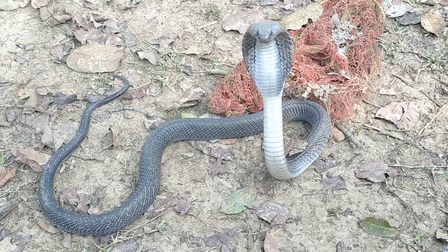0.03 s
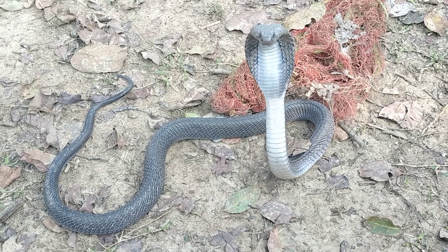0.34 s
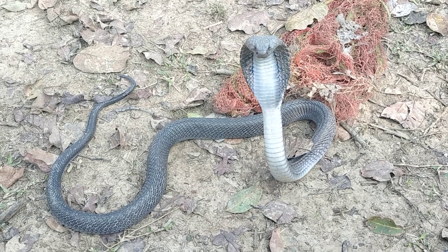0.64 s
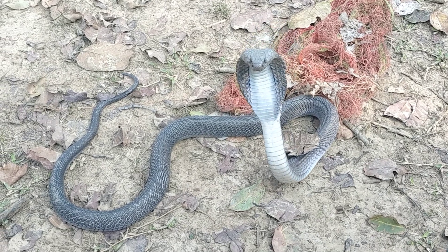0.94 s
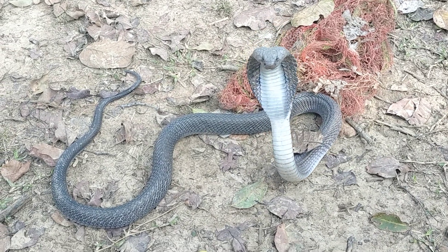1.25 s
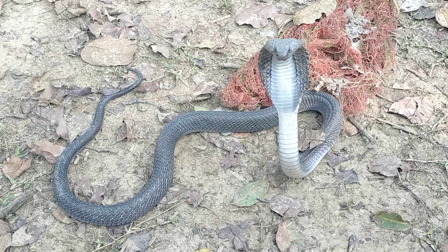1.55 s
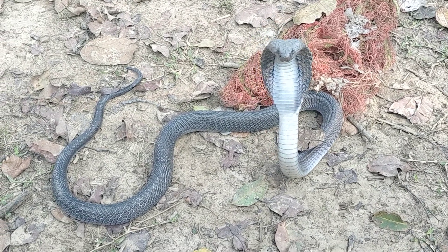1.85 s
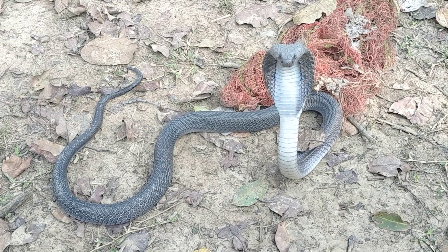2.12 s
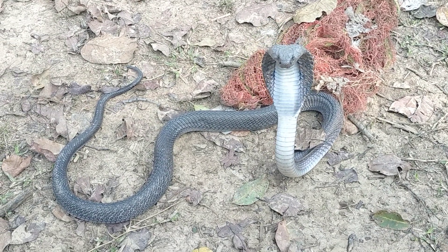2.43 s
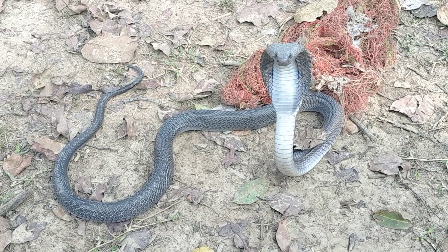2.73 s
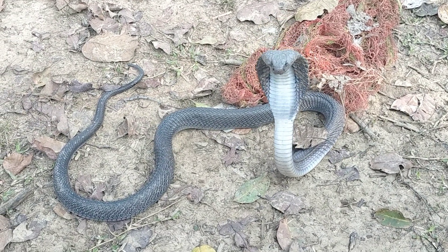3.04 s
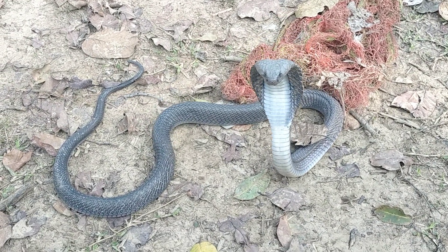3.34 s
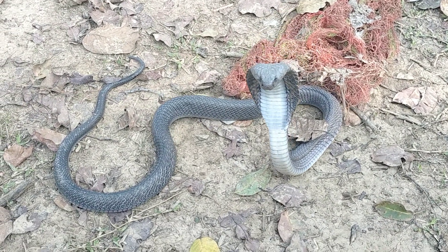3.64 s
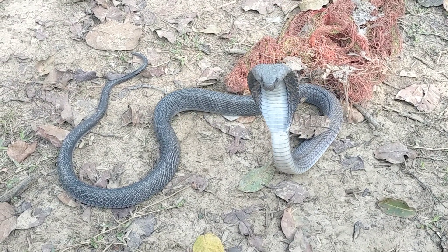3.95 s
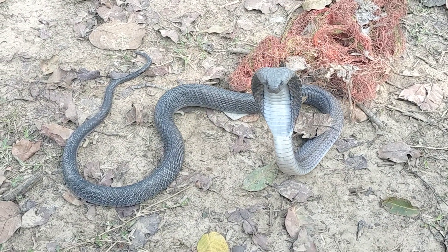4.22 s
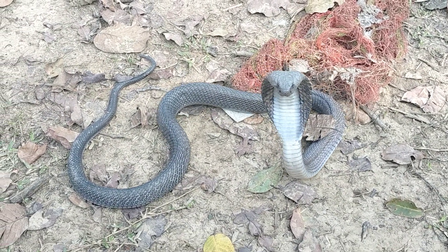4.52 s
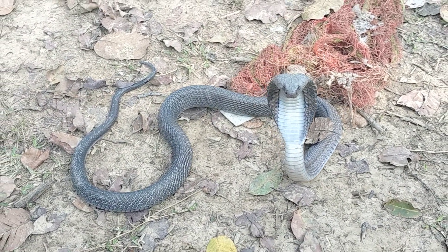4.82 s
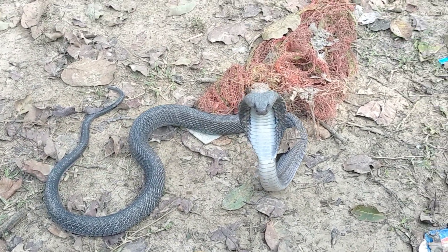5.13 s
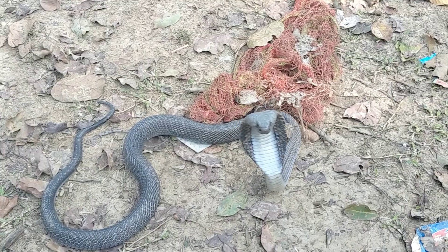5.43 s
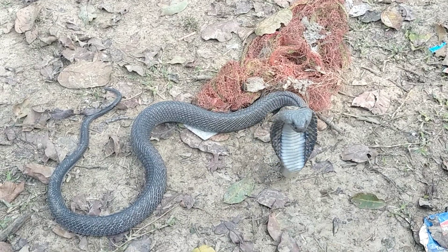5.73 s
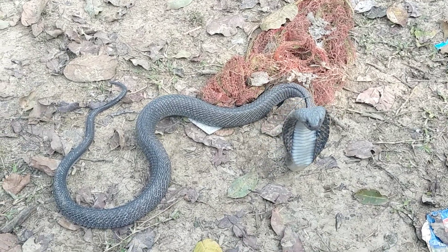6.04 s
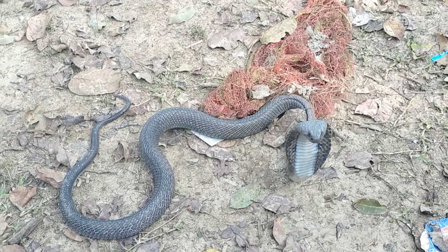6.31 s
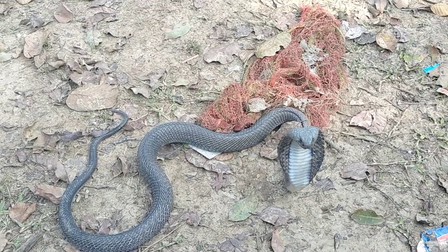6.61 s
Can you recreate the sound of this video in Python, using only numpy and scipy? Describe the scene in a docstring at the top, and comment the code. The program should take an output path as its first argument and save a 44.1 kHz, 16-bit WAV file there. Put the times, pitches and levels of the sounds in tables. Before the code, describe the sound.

Outdoors, a distant engine hums over a low rumble and a soft airy breeze. A thin, faint high hiss, perhaps from a cobra, comes and goes twice. Close by and slightly to the right, the snake's scales scrape dry leaves with a few sharp snaps. Later it lunges in a louder burst of crunching leaves and dull scuffs on gritty earth, followed by two softer scrapes.

```python
"""A cobra on dry earth and dead leaves shifts and lunges outdoors: its scales scrape and snap
the leaves, and its weight scuffs grit over the ground. A thin high hiss, perhaps the snake,
comes and goes twice. Behind it a distant engine hums, slows and fades into a low drone and
rumble, while the airy wash of the breeze slowly brightens."""
import sys
import numpy as np
from scipy import signal
from scipy.io import wavfile

SR = 44100
rng = np.random.default_rng(int(sys.argv[2]) if len(sys.argv) > 2 else 0)


def wav_record(signal):
    """Record a signal, one row per channel, as 16-bit PCM in the file named by sys.argv[1]."""
    frames = np.transpose(np.atleast_2d(signal))
    bounded = np.clip(frames, -1, 1)
    # unit amplitude maps onto the largest positive 16-bit level
    quanta = np.round(bounded * 32767).astype(np.int16)
    wavfile.write(sys.argv[1], SR, quanta)


N = 294147
START_S = .572
TIME_S = np.arange(N) / SR
ELAPSED_S = np.maximum(TIME_S - START_S, 0)


def from_db(db):
    """Decibels to gain."""
    return np.exp(np.asarray(db) * (np.log(10) / 20))


def unit_rms(x):
    """Scale to rms 1."""
    return x / np.sqrt(np.mean(x ** 2) + 1e-20)


def at_hz(points, hz):
    """Interpolate a curve on a log-frequency axis."""
    points = np.array(points)
    return np.interp(np.log(hz), np.log(points[:, 0]), points[:, 1])


def band(x, low_hz, high_hz):
    """Causal band-pass."""
    sos = signal.butter(2, [low_hz, min(high_hz, .45 * SR)], "band", fs=SR, output="sos")
    return signal.sosfilt(sos, x)


def drift(rate_hz):
    """Slow random wander, rms 1."""
    pole = np.exp(-200 * np.pi * rate_hz / SR)
    white = rng.standard_normal(N // 100 + 1002)
    slow = signal.lfilter([1], [1, -2 * pole, pole * pole], white)[1000:]
    return np.interp(np.arange(N) / 100, np.arange(len(slow)), unit_rms(slow))


def build_up(level_db, deficit_db, settle_s, growth_db_per_s):
    """Gain that settles from below, then grows slowly."""
    return from_db(level_db - deficit_db * np.exp(-ELAPSED_S / settle_s) + growth_db_per_s * ELAPSED_S)


def swell(full_s, until_s, rise_s, fall_s, sag_db_per_s=0):
    """Gain with exponential rise, sagging hold and exponential fall."""
    rise = np.exp(-np.maximum(full_s - TIME_S, 0) / rise_s)
    fall = np.exp(-np.maximum(TIME_S - until_s, 0) / fall_s)
    held_s = np.clip(TIME_S, full_s, until_s) - full_s
    return rise * fall * from_db(-sag_db_per_s * held_s)


def crackle(per_s, grain_s, size_db):
    """Envelope of dense tiny cracks of uneven size, rms 1."""
    hits = rng.random(N) < per_s / SR
    sizes = from_db(size_db * np.minimum(rng.exponential(1, N), 3))
    return unit_rms(signal.lfilter([1], [1, -np.exp(-1 / (grain_s * SR))], hits * sizes + 1e-18))


# Stereo width. Each row: frequency in Hz, left-right correlation (clipped to +-1).
CORRELATION = [(60, 2), (180, 0.8), (350, 0.95), (700, 0.34), (1400, -0.22), (2300, 0.26), (3600, 0),
               (13000, 0.2)]
# Stereo balance. Each row: frequency in Hz, left minus right in dB.
BALANCE = [(100, -0.9), (600, -0.8), (1300, -3), (2400, -2.5), (3700, -9.5), (5300, -10), (7200, 1),
           (9200, -7.5), (11500, -10), (15000, -12)]

def stereo_noise(spectrum, flutter_db, drive=1):
    """Stereo noise, shaped in time by drive, in narrow bands that flutter independently."""
    edges_hz = np.r_[np.geomspace(20, 2500, 22)[:-1], np.geomspace(2500, 16500, 18)]
    white = rng.standard_normal((2, 2, N)) * drive
    out, power = np.zeros((2, N)), 0
    for k, (low, high) in enumerate(zip(edges_hz, edges_hz[1:])):
        if high < spectrum[0][0] or low > spectrum[-1][0]:
            continue
        hz = np.sqrt(low * high)
        alike = np.clip(at_hz(CORRELATION, hz), -1, 1)
        pan = from_db(at_hz(BALANCE, hz) * np.array([[.5], [-.5]]))
        mid_side_to_stereo = pan * np.sqrt([1 + alike, 1 - alike]) * [[1, 1], [1, -1]]
        pair = mid_side_to_stereo @ band(white[k % 2], low, high)
        gain = from_db(at_hz(spectrum, hz)) * np.sqrt(high - low)
        flutter = from_db(flutter_db * drift(14.3))
        out += gain / np.std(pair.mean(axis=0)) * flutter * pair
        power += gain ** 2
    return out / np.sqrt(power)


# Engine lines. Each row: multiple of the crank rate, relative level in dB.
CRANK_ORDERS = [(2, -7.5), (4, -4.5), (5, -9.5), (6, -1.5), (7, -12), (8, -5.5), (9, -2.5), (10, -17),
                (15, -17)]

def engine(start_hz=96.74, idle_hz=94.25, slowing_s=3.0, throb_hz=1.69, hold_until_s=3.3):
    """Firing sags towards idle, three firings a turn; the air on the way makes each line waver."""
    firing_hz = idle_hz + (start_hz - idle_hz) * np.exp(-(ELAPSED_S / slowing_s) ** 2)
    firing_phase = 2 * np.pi * np.cumsum(firing_hz) / SR
    throb_db = 4.5 * np.cos(2 * np.pi * throb_hz * (TIME_S - 3.36))
    tone_db = -40 + throb_db - 3.5 * np.maximum(TIME_S - hold_until_s, 0)
    out = from_db(tone_db + drift(5.6)) * np.sin(firing_phase + 0.12 * drift(19))
    fourth_gain = swell(1.78, 1.78, rise_s=.3, fall_s=1.9) * from_db(-50 + 0.65 * drift(1.4))
    out += fourth_gain * np.sin(4 * firing_phase + 0.62 * drift(13))
    orders_db = -42.5 - 3 * ELAPSED_S
    for order, level_db in CRANK_ORDERS:
        phase = firing_phase * order / 3 + 2 * np.pi * rng.random()
        gain = from_db(orders_db + level_db + 2.5 * drift(4.8))
        out += gain * np.sin(phase + 0.15 * drift(5.6))
    return np.sqrt(2) * out


# Drone resonances. Each row: centre in Hz, width in Hz, relative level in dB, growth in dB/s.
DRONE_MODES = [(60.3, 11.4, 3, 0), (120.3, 13.8, -7, 0.38), (178.8, 24, -11, 1), (214, 26, -14.5, 1.5)]
# Each *_BUILD: level in dB, initial deficit in dB, settling time in seconds, growth in dB/s.
DRONE_BUILD = (-43.5, 11.5, 1.2, 0.14)

def drone():
    """Narrow noise bands make a lumpy boom that grows; its overtones come up later."""
    out = np.zeros(N)
    for hz, width_hz, level_db, growth_db_per_s in DRONE_MODES:
        mode = unit_rms(band(rng.standard_normal(N), hz - width_hz / 2, hz + width_hz / 2))
        out += from_db(level_db + growth_db_per_s * ELAPSED_S) * mode
    return build_up(*DRONE_BUILD) * out


# Rumble spectrum. Each row: frequency in Hz, relative density in dB.
RUMBLE_SPECTRUM = [(22, -17), (32, -5), (45, -1.5), (62, -2.5), (85, 3.5), (120, -1.5), (160, -2.5),
                   (230, -11.5), (320, -9), (450, -15.5), (700, -44)]
RUMBLE_BUILD = (-40.5, 4, 0.1, 0.5)

def far_sounds(right_lag_s=0.00034):
    """Rumble, engine and drone arrive from afar, reaching the left side first."""
    rumble = build_up(*RUMBLE_BUILD) * stereo_noise(RUMBLE_SPECTRUM, flutter_db=0.8)
    left, right = rumble + engine() + drone()
    late_right = np.interp(TIME_S - right_lag_s, TIME_S, right)
    return np.array([left, late_right * from_db(0.1)])


# Air and foliage spectra. Each row: frequency in Hz, relative density in dB.
WASH_SPECTRUM = [(250, 1), (420, -1.5), (600, -1), (950, 0.5), (1120, -2), (1400, -2.5), (2000, -7),
                 (2550, -7), (2950, -21.5), (4000, -26)]
FOLIAGE_SPECTRUM = [(2400, -34), (3000, 1.5), (3600, 5), (4300, 0), (5000, -5.5), (5700, -6), (6700, -18),
                    (7500, -19.5), (8500, -22.5), (11000, -25.5), (15500, -31)]
WASH_BUILD = (-43, 4, 0.62, 0.2549)
FOLIAGE_BUILD = (-56, 4.5, 1.3, 0.6946)

def breeze():
    """A broad wash of air; the soft treble of foliage slowly gains on it."""
    wash = build_up(*WASH_BUILD) * stereo_noise(WASH_SPECTRUM, flutter_db=0.8)
    foliage = build_up(*FOLIAGE_BUILD) * stereo_noise(FOLIAGE_SPECTRUM, flutter_db=1.0)
    return wash + foliage


# Jet spectrum. Each row: frequency in Hz, relative density in dB.
HISS_SPECTRUM = [(6000, -24), (8500, -7), (10200, -3), (11100, 1), (12400, 2), (14000, 1), (15800, -9)]
# Hisses. Each row: hold start and end in seconds, level in dB, rise and fall in seconds.
HISSES = [(1.85, 2.7, -63, 0.79, 0.07), (3.198, 5.3, -68, 0.11, 0.81)]

def hiss(sag_db_per_s=1.4, echo_s=0.001, echo_gain=0.27):
    """A thin air jet sags as its pressure drops; a close reflection makes it faintly hollow."""
    flow = sum(from_db(level_db) * swell(full_s, until_s, rise_s, fall_s, sag_db_per_s)
               for full_s, until_s, level_db, rise_s, fall_s in HISSES)
    jet = flow * stereo_noise(HISS_SPECTRUM, flutter_db=1.0)
    return jet + echo_gain * np.roll(jet, round(echo_s * SR), axis=1)


# Leaf crunch and scale rasp spectra. Each row: frequency in Hz, relative density in dB.
CRUNCH_SPECTRUM = [(700, -19), (2000, 2), (2900, -5), (3800, 4), (5300, 3), (6600, -10), (9300, -15),
                   (15800, -28)]
RASP_SPECTRUM = [(5500, -13), (7500, -1.5), (9400, -20), (10400, -12), (11200, 4.5), (12500, 2),
                 (14000, -4), (15800, -1)]
# Body slides. Each row: peak time in seconds, crunch and rasp in dB, rise and fall in seconds.
SLIDES = [(2.225, -48.5, -62, 0.035, .02), (2.28, -61, -74, .03, .13), (5.1, -58.5, -87, 0.97, .8),
          (5.26, -50, -57.5, 0.078, 0.068), (5.345, -45, -49, 0.049, 0.055),
          (5.432, -40.5, -47.5, 0.023, 0.026), (5.58, -47.5, -64, 0.22, 0.057),
          (6.36, -53.5, -69.5, 0.052, 0.27), (6.66, -45, -57.5, 0.033, .1)]

def scrape():
    """Scales drag over dry leaves: the leaves crunch, the scale edges rasp."""
    _, crunch_db, rasp_db, _, _ = np.transpose(SLIDES)
    motion = np.array([swell(peak_s, peak_s, rise_s, fall_s) for peak_s, _, _, rise_s, fall_s in SLIDES])
    crunch_gain = np.sqrt(from_db(crunch_db) ** 2 @ motion ** 2)
    rasp_gain = np.sqrt(from_db(rasp_db) ** 2 @ motion ** 2)
    cracks = crackle(per_s=1300, grain_s=0.0017, size_db=-2.0) + .2
    crunch = crunch_gain * stereo_noise(CRUNCH_SPECTRUM, flutter_db=1.9, drive=cracks)
    rasp = rasp_gain * stereo_noise(RASP_SPECTRUM, flutter_db=4.0, drive=cracks)
    return crunch + rasp


# Leaf snaps. Each row: start in seconds, burst level in dB, edge send in dB.
LEAF_SNAPS = [(2.2343, -25.5, -5), (2.28, -32, -22), (2.356, -31.5, -20), (2.4039, -35, -22),
              (5.2174, -33, -19), (5.2404, -29.5, -9), (5.3754, -30, -10), (5.4267, -21.5, -16),
              (5.4327, -24, -26), (5.494, -25, -18), (5.5004, -22.5, -19), (5.5628, -26, -21),
              (5.5707, -23, -14), (5.6194, -35, -13)]

def leaf_snaps(attack_s=0.00079, t60_s=0.0099):
    """A leaf gives way: a short burst in its body, with a brittle edge above."""
    body, edge = np.zeros((2, 2, N))
    t = np.arange(SR // 10) / SR
    for start_s, level_db, edge_db in LEAF_SNAPS:
        at = round(start_s * SR)
        envelope = from_db(level_db - 60 * t / t60_s) * (1 - np.exp(-(t / attack_s) ** 2))
        burst = (rng.standard_normal((2, len(t))) * envelope)[:, :N - at]
        body[:, at:at + len(t)] += burst
        edge[:, at:at + len(t)] += burst * from_db(edge_db)
    body = band(body + 1e-18, 3550, 5820) * from_db([[1], [10]])   # left, right
    high_edge = band(edge + 1e-18, 7800, 13300) * from_db([[2], [7]])
    low_edge = 1.2 * band(edge + 1e-18, 5700, 8600)
    return body + from_db(3) * (high_edge + low_edge)


# Earth spectrum. Each row: frequency in Hz, relative density in dB.
EARTH_SPECTRUM = [(250, -17), (380, 1.5), (700, 0), (1300, -4), (2000, -15), (2900, -17), (4000, -15.5)]
# Pushes on the ground. Each row: centre in seconds, level in dB, half length in seconds.
SCUFFS = [(5.134, -44, .04), (5.2, -35.5, .014), (5.258, -39.5, 0.024), (5.292, -30, 0.0017),
          (5.32, -45, .03), (5.356, -33.5, .003), (5.42, -36, 0.015), (5.456, -39.5, .009),
          (6.37, -45, .049)]

def scuffs():
    """The body's weight shoves grit over packed earth in short, dull pushes."""
    push_power = sum(from_db(level_db) ** 2 * np.exp(-((TIME_S - centre_s) / half_s) ** 2)
                     for centre_s, level_db, half_s in SCUFFS)
    grit = crackle(per_s=600, grain_s=.0012, size_db=2.0) + .25
    return np.sqrt(push_power) * stereo_noise(EARTH_SPECTRUM, flutter_db=0.0, drive=grit)


def scene():
    """Far sounds sit near the centre; near ones lean right."""
    return far_sounds() + breeze() + hiss() + scrape() + scuffs() + leaf_snaps()


def record(dry):
    """Silence until START_S, a 3 ms fade-in, then a steep low-pass."""
    fade_in = np.clip((TIME_S - START_S) / .003, 0, 1)
    cutoff_hz = 15720
    return signal.sosfilt(signal.ellip(10, .2, 70, cutoff_hz, fs=SR, output="sos"), dry * fade_in)


dry = scene()
out = record(dry)
wav_record(out)
```